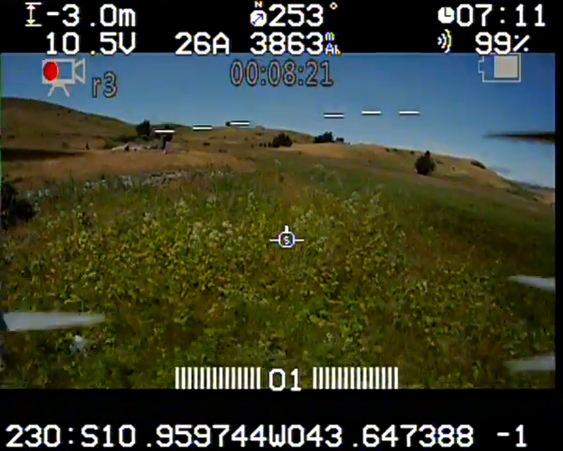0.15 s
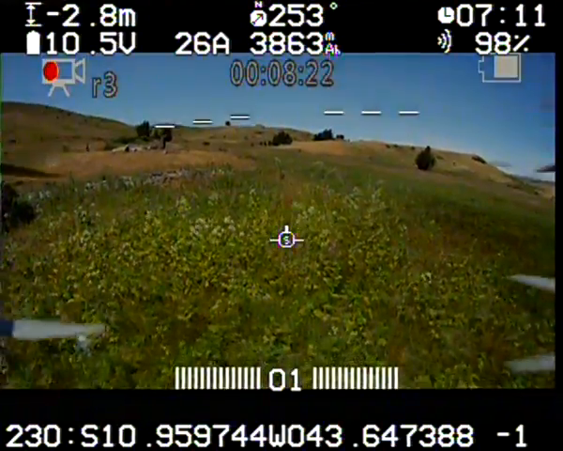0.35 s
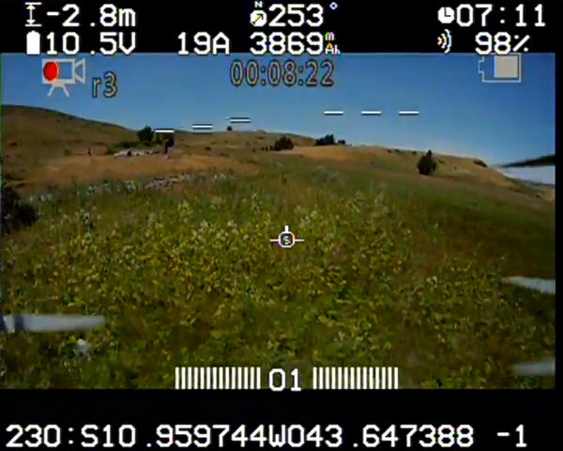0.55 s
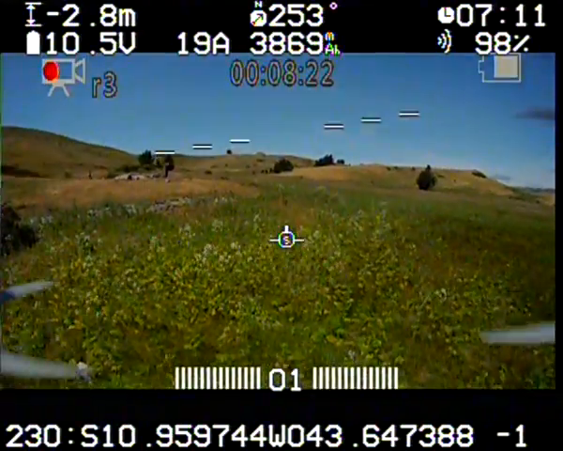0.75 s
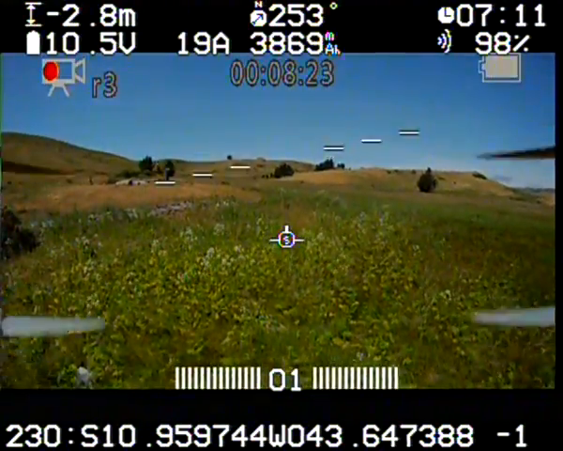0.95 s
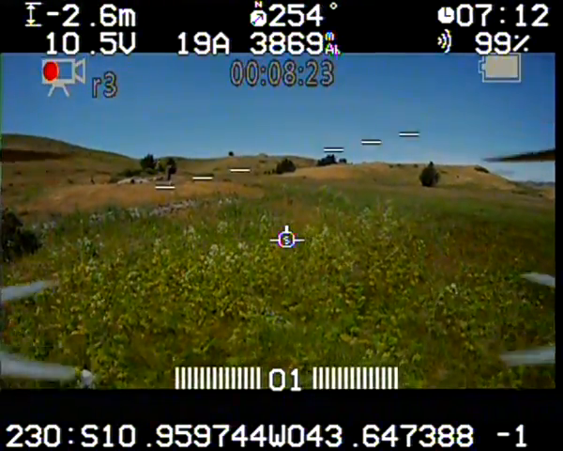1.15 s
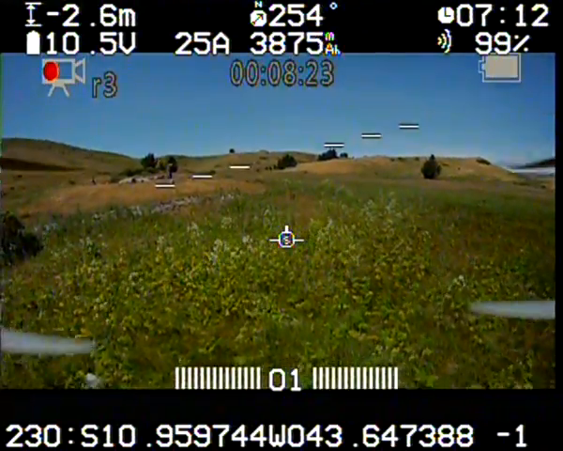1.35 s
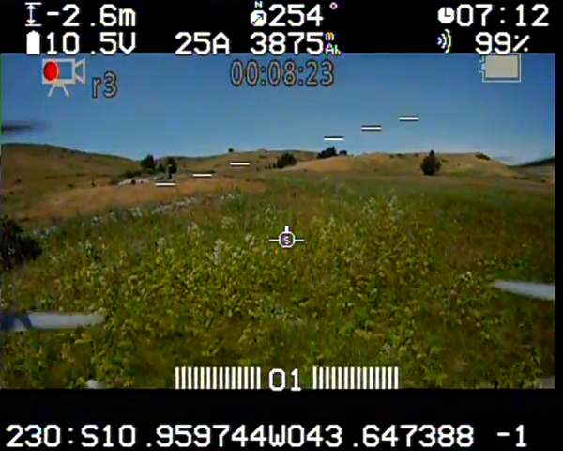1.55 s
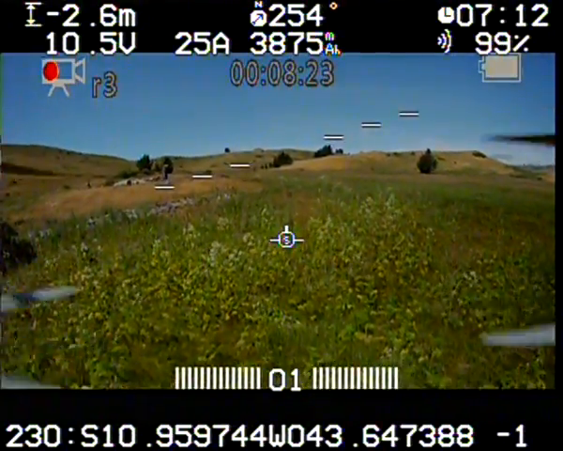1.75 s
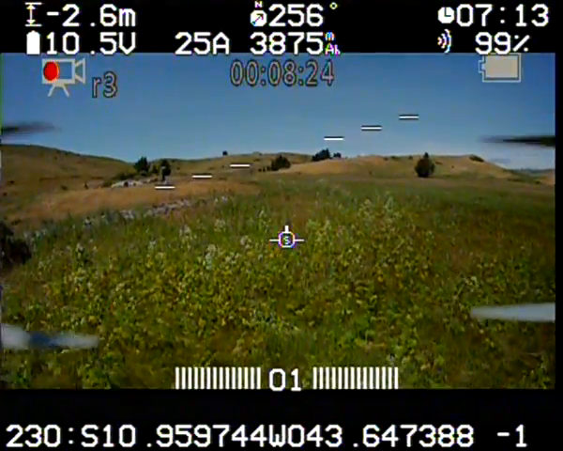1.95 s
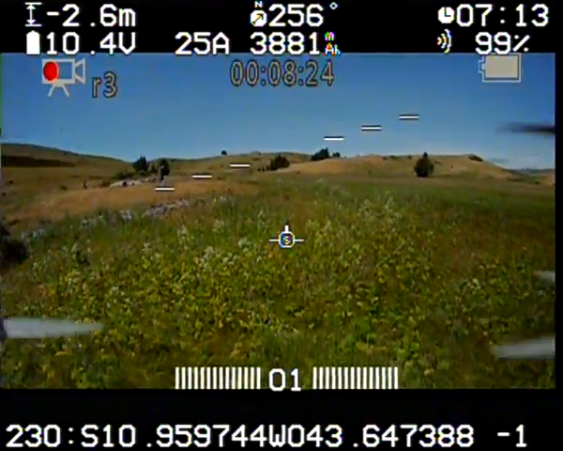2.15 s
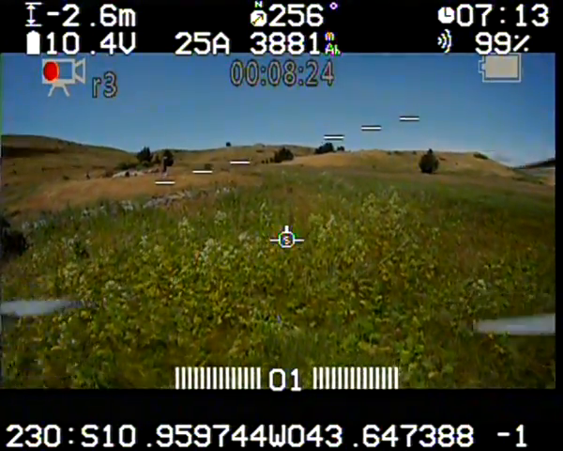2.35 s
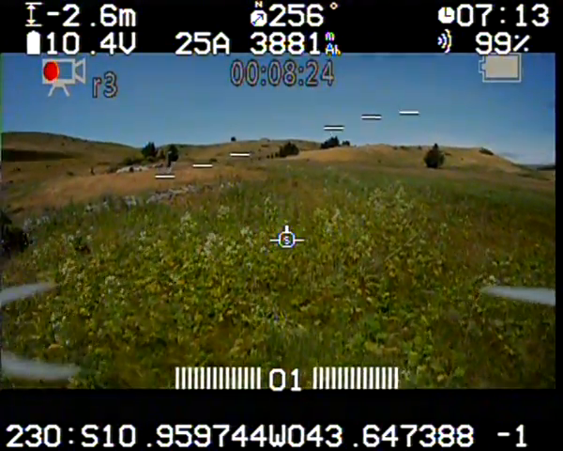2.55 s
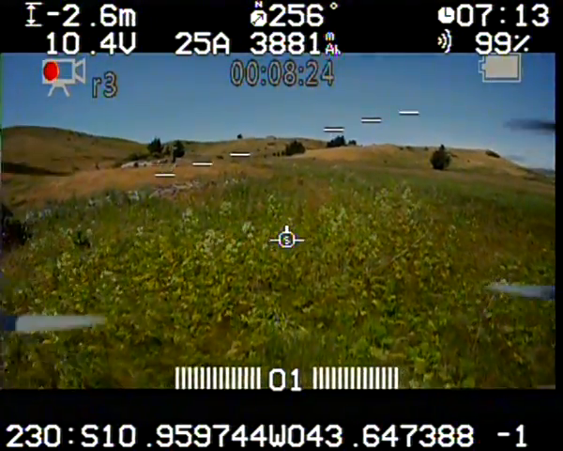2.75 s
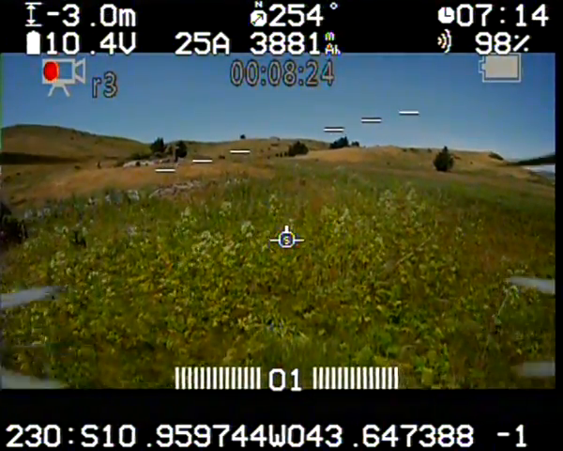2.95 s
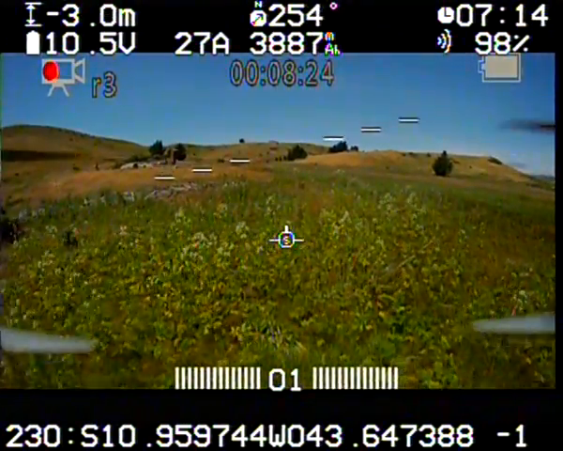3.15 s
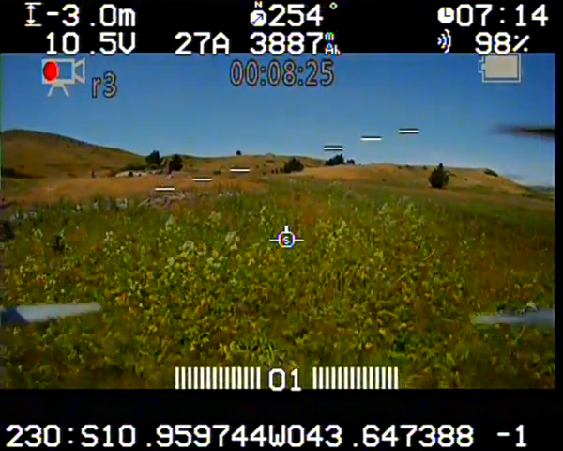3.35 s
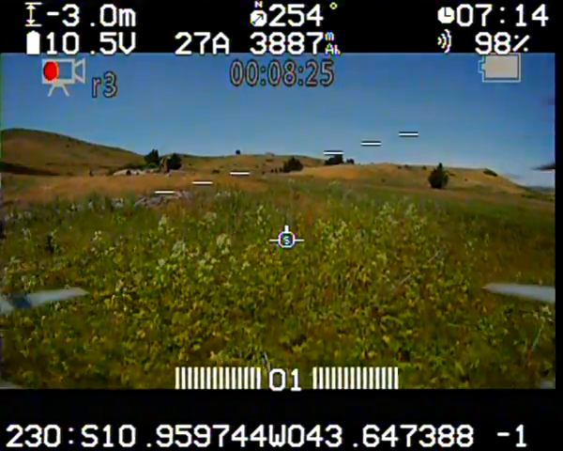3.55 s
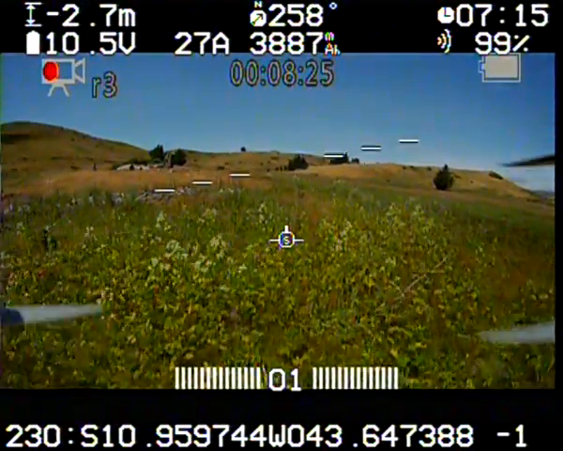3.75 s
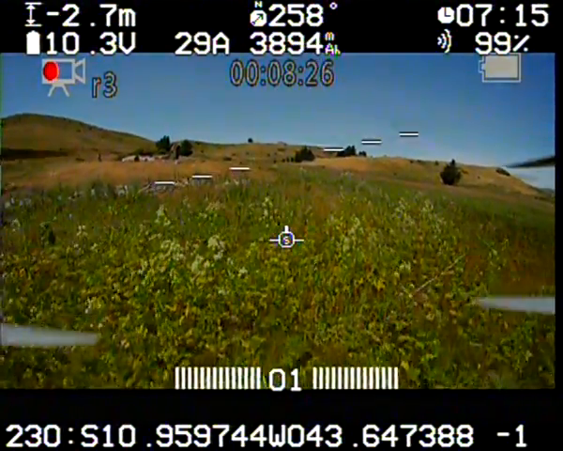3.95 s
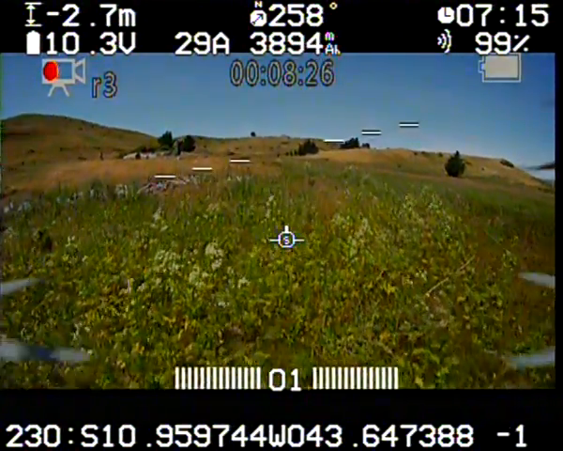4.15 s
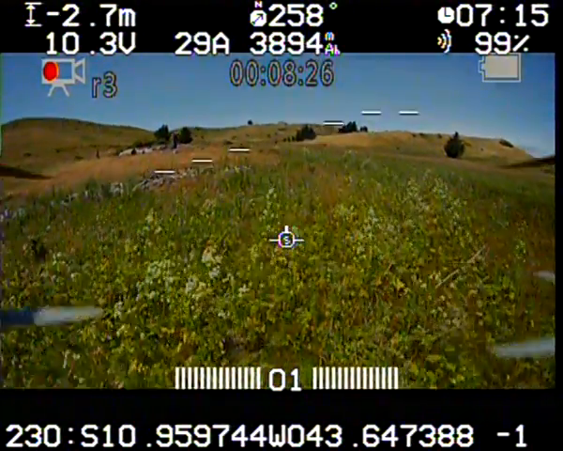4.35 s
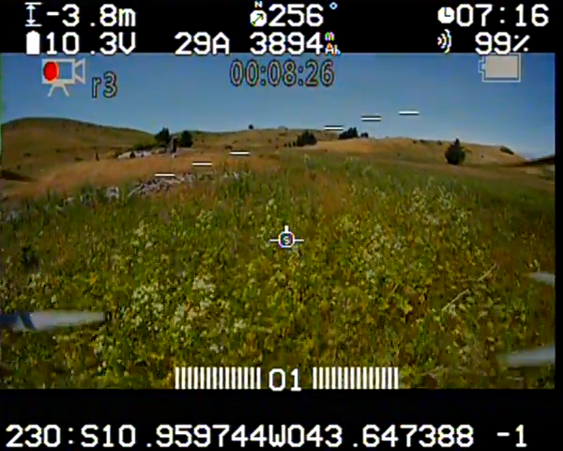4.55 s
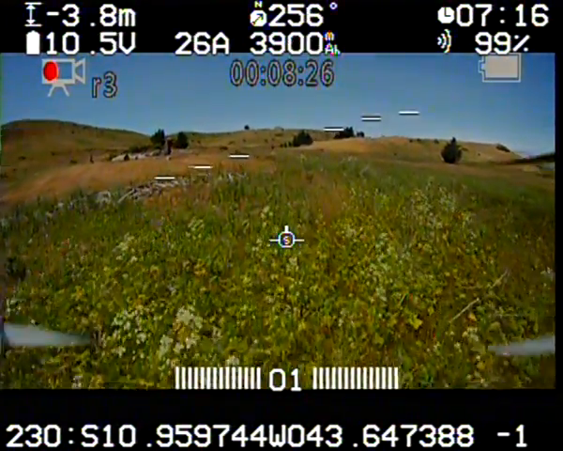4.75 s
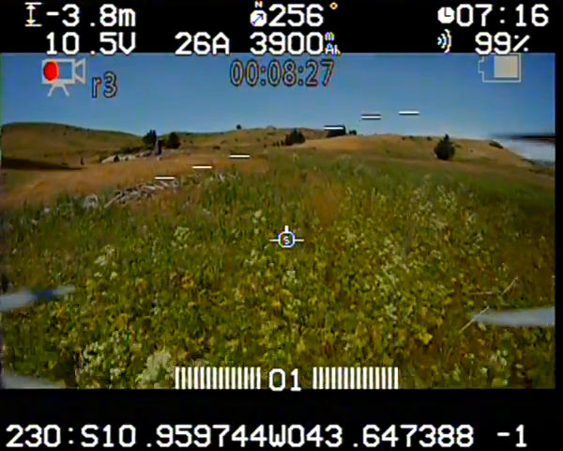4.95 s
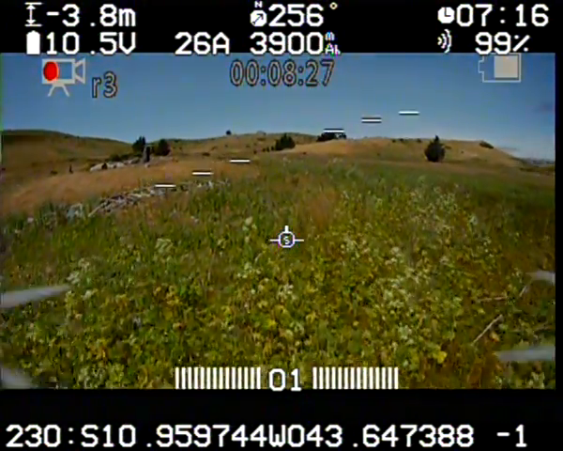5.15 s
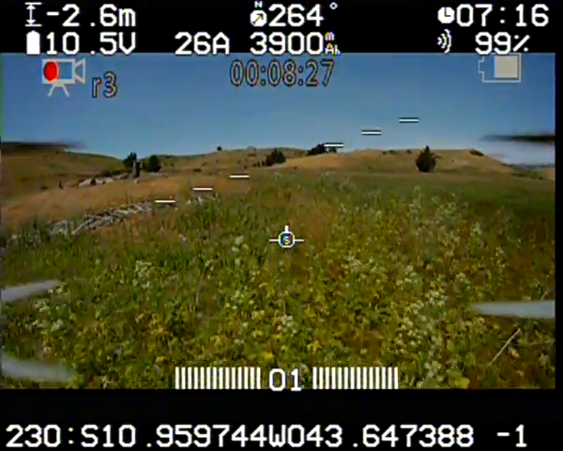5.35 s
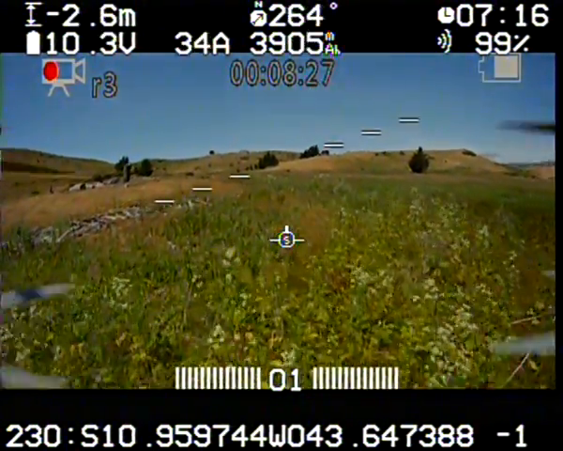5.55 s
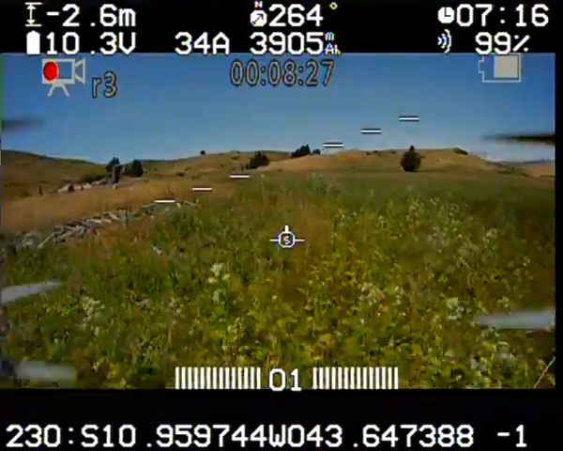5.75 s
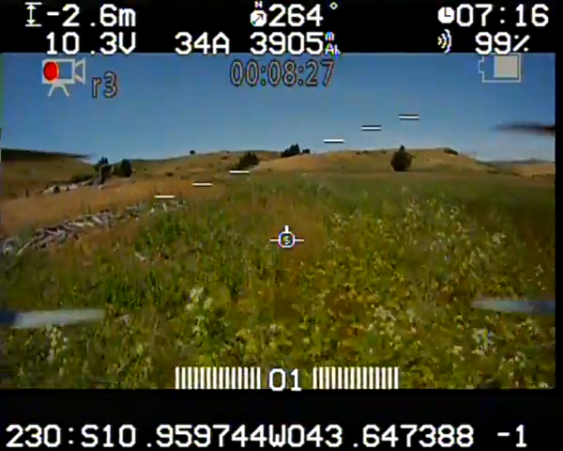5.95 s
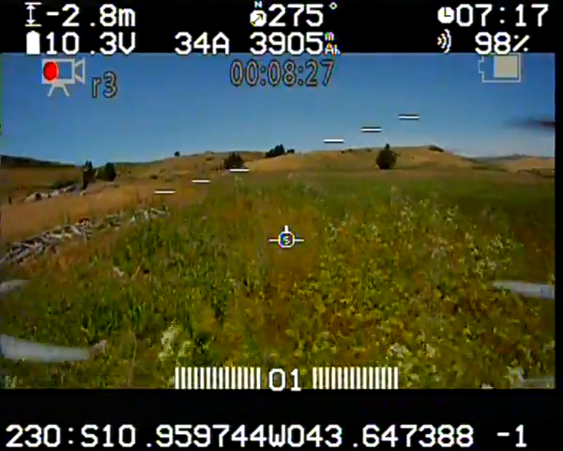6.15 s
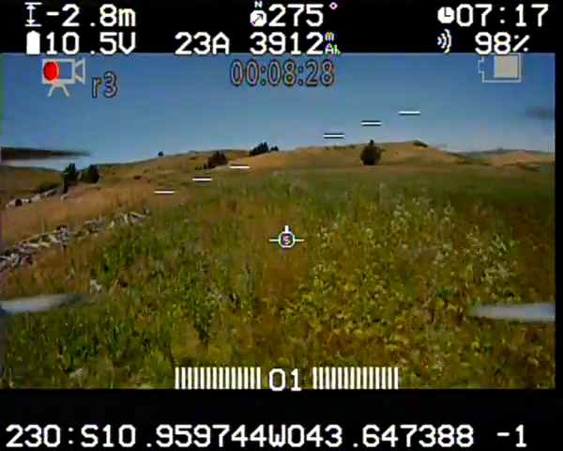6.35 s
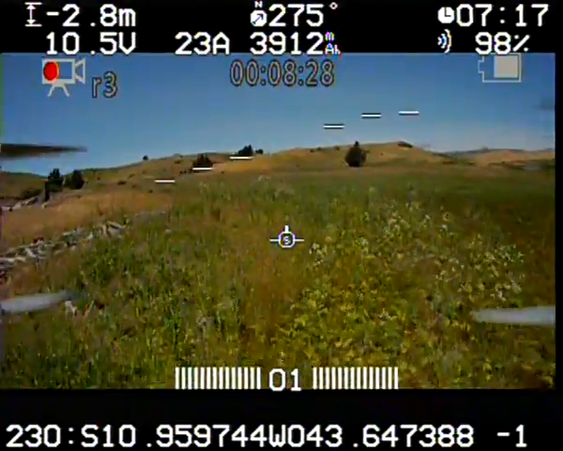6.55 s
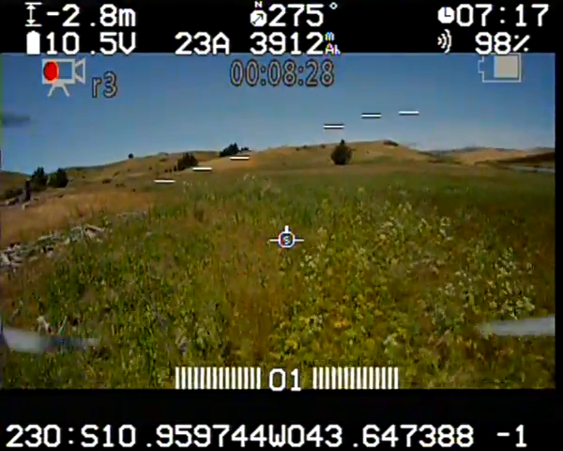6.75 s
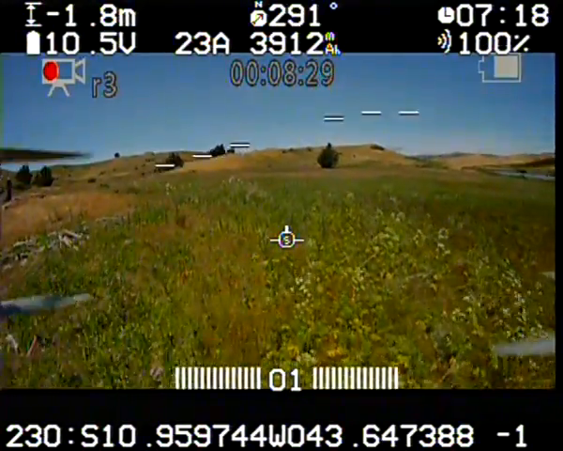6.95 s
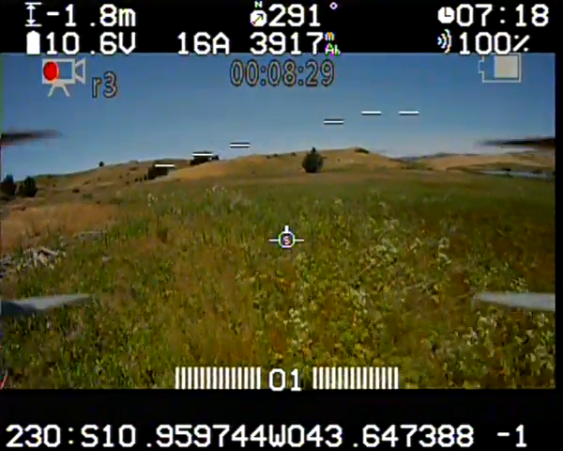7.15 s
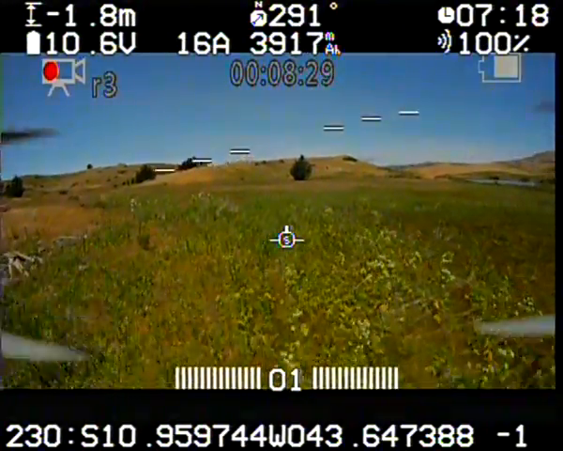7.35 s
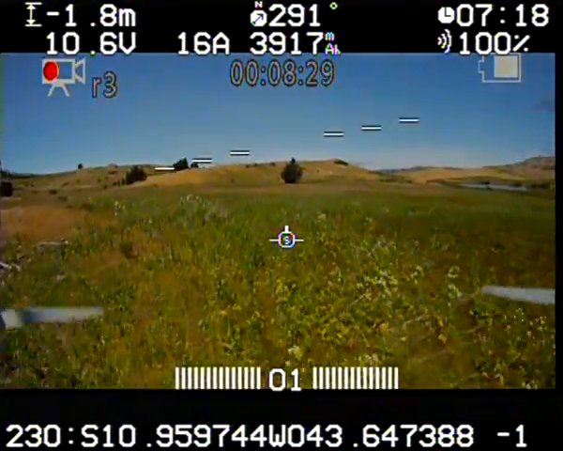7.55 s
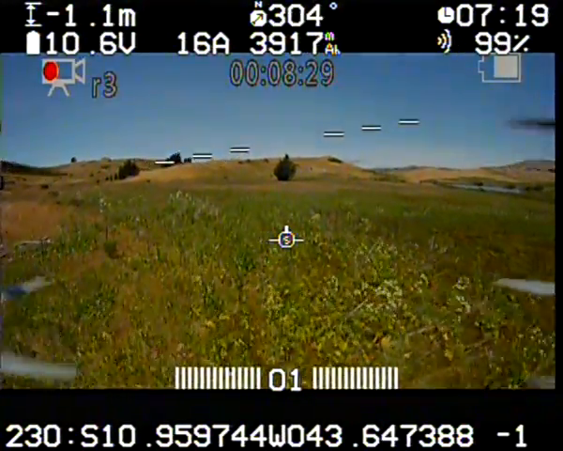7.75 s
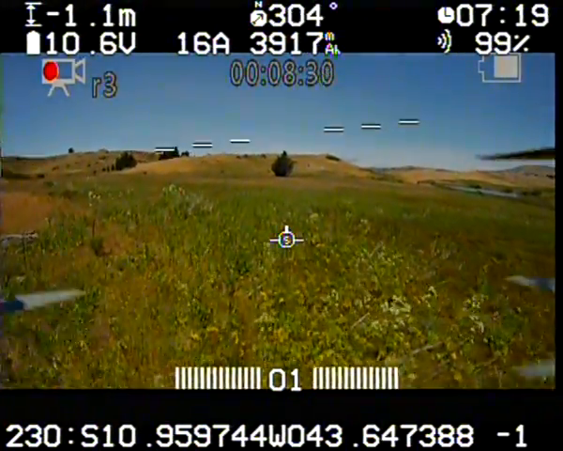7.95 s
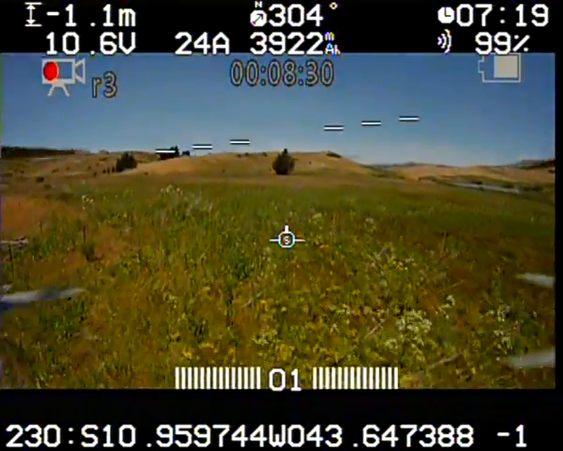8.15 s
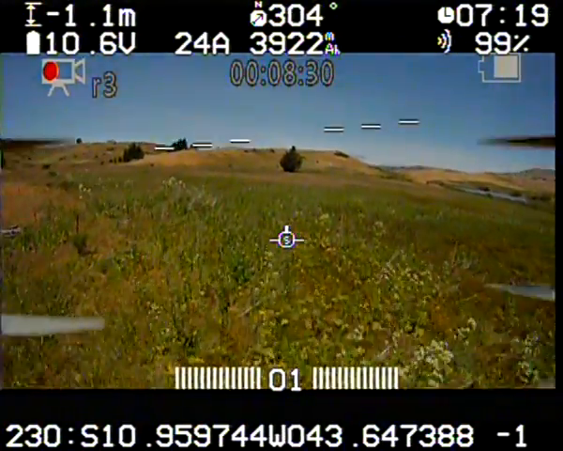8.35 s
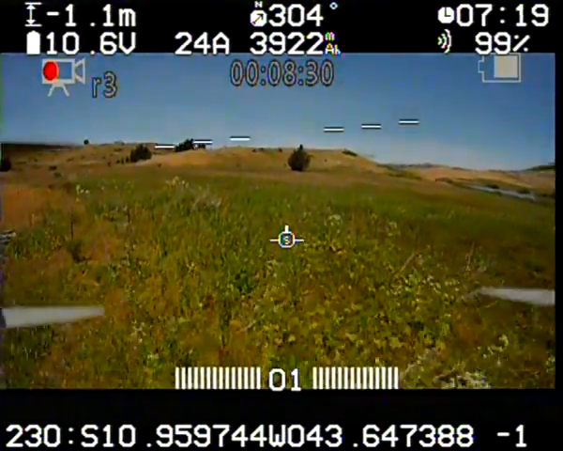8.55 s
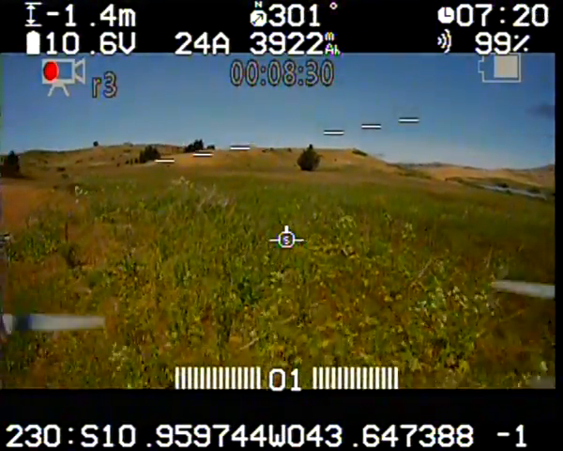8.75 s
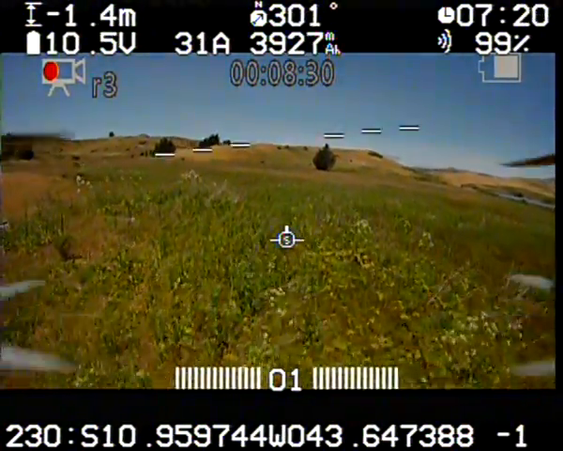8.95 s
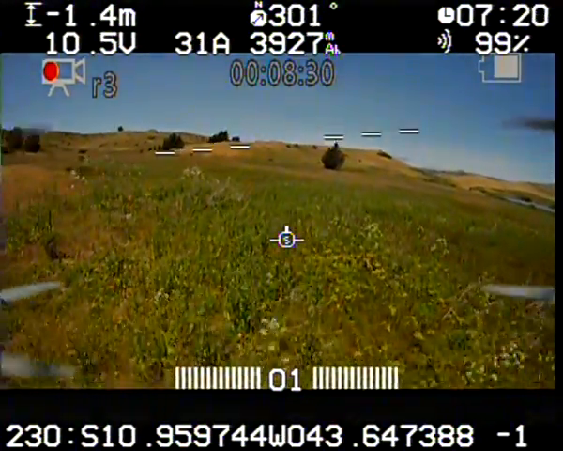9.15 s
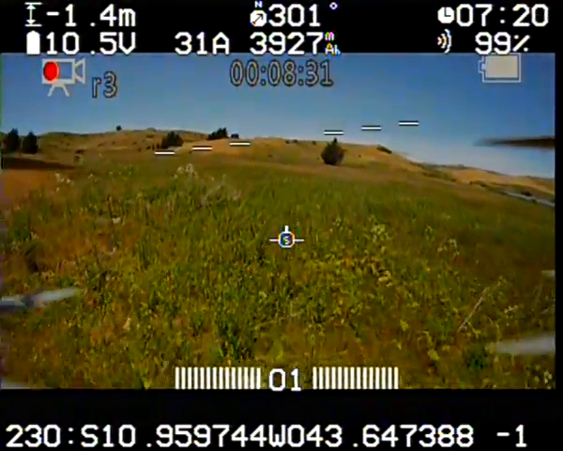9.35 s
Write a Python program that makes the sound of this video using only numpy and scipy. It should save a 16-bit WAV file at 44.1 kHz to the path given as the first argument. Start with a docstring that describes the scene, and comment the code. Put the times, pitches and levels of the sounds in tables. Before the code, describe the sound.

Through a small hissy microphone, a car rushes by with roaring tyres, followed by two heavy vehicles droning past, their low hums and whines bending downward.

```python
"""Traffic across open grassland

Motor traffic passes in open grassland, heard through a small, hissy microphone.
A car goes by with a roar of tyres, then two heavier vehicles, each with an engine hum that sinks in pitch.
Road sound is shaped noise that swells with each pass; hums and whines are sines geared to the firing rate.
Two short low drones come and go, as of tyres running over a ribbed road marking.
Small ticks, airy swishes, faint squeaks and blips dot the scene."""
import sys
import numpy as np
from scipy import signal
from scipy.fft import rfft, irfft
from scipy.io import wavfile

SR = 44100
rng = np.random.default_rng(int(sys.argv[2]) if len(sys.argv) > 2 else 0)


def to_wav(s):
    """Save 16-bit WAV."""
    ch = np.atleast_2d(s).T  # columns
    pcm = np.round(np.clip(ch, -1, 1) * 32767)  # PCM
    wavfile.write(sys.argv[1], SR, pcm.astype(np.int16))


N = 414540
TIME = np.arange(N) / SR  # seconds
BINS = np.maximum(np.arange(N // 2 + 1) * SR / N, 1)  # Hz, floored at 1 so that its log exists

# vehicles going by: closest_s, approach_s, retreat_s, boom_db, roar_db, tyre_hiss_db, rush_db
PASSES = [(0, 1.0, 1.2, -45, -62, -53, -55.5), (1.35, 1.23, 3.1, -36.5, -37, -36, -55),
          (2.44, 1.5, 0.96, -25, -33.5, -29, -45.5), (4.78, 0.81, 0.86, -25, -29, -32, -40.5),
          (6.24, 1.28, 0.82, -27, -29.5, -33, -43.5), (8.85, 2.1, 4.8, -50, -52, -47, -58)]
# how steeply boom, roar, tyre hiss and rush fall off: power_of_distance for each
ROAD_FALLOFF = [2.82, 4, 4.3, 5.0]
# level of the deep rumble: time_s, level_db
RUMBLE_LEVEL = [(0, -33.5), (.9, -32), (1.9, -23.5), (2.6, -20), (3.6, -29), (6.3, -27.5), (7.2, -31),
                (7.8, -28), (9.4, -35)]
# roar surging as wheels draw level with the microphone: centre_s, half_length_s, boost_db
SURGES = [(2.497, 0.069, 2), (3.056, 0.074, 3), (3.955, 0.12, 5), (4.73, 0.039, 3.5), (4.98, 0.064, 3.8),
          (6.249, 0.067, 4), (6.602, 0.15, 1.5), (9.36, 0.045, 4.5)]

# noise colours, from deep to bright: frequency_hz, relative level_db_per_hz
RUMBLE_COLOUR = [(8, -18.5), (20, 4), (35, -6), (70, -0.5), (120, -3.5), (170, -7), (240, -15), (400, -37)]
BOOM_COLOUR = [(50, -16), (110, 2), (170, 2.5), (280, 0), (400, -3.5), (500, -3.5), (620, -22.5),
               (900, -45)]
ROAR_COLOUR = [(330, -22), (480, 4.5), (590, 7), (740, 5.5), (850, 1), (1100, -26)]
TYRE_COLOUR = [(600, -15), (760, -8.5), (850, -1), (1000, -2.5), (1120, -7), (1260, -16.5), (1500, -38),
               (2200, -45)]
RUSH_COLOUR = [(900, -15), (1280, 6.5), (1500, 0), (1880, -5.5), (2200, -16), (3400, -20.5), (6000, -22.5),
               (10000, -22)]

# strength of the car's tread note: time_s, level_db
TREAD_LEVEL = [(0, -42.5), (1.2, -32.5), (1.5, -29), (2.15, -31.5), (2.55, -25), (3.05, -22), (3.25, -35.5),
               (4, -70)]
# tread note at rest (Hz), moment and half-length of its bend (s), share by which motion shifts it
TREAD_HZ, CAR_LEVEL_S, CAR_HALF_S, DOPPLER_SHARE = 229.8, 2.58, 0.27, 0.14

# low drones: start_s, end_s, pitch_hz, tone_db, shudder_db
DRONES = [(0.39, 1.032, 87.5, -27.5, -38.5), (7.462, 8.352, 104, -22, -26)]
# colour of the shudder under the drones: frequency_hz, relative level_db_per_hz
SHUDDER_COLOUR = [(30, -14), (50, 1), (82, 19), (110, 6), (140, 5), (250, -19)]

# small ticks and knocks: time_s, peak_db, centre_hz, width_hz
TICKS = [(1.006, -22, 900, 300), (1.109, -24, 840, 300), (1.298, -29, 1660, 657), (1.298, -30, 4330, 1200),
         (1.345, -18.5, 900, 500), (2.509, -26, 9830, 4500)]

# airy swish of each vehicle drawing level: centre_s, half_length_s, level_db
SWISHES = [(2.4, 0.36, -60), (4.852, 0.18, -65), (6.245, 0.26, -51)]
# colour of the swish: frequency_hz, relative level_db_per_hz
SWISH_COLOUR = [(1500, -20), (2600, -3), (3500, 2.5), (5000, 0), (6200, -1), (10000, -8.5), (13000, -14)]

# firing rate of each engine, lowered as it passes: time_s, pitch_hz
FIRST_PITCH = [(0, 71.5), (3, 72.1), (4.2, 71), (4.6, 69.1), (5, 65.7), (5.4, 62.7), (6, 60.4), (7.8, 59.1),
               (9.4, 57.2)]
SECOND_PITCH = [(3.8, 124), (5.75, 121.5), (6.2, 117.6), (6.6, 111.7), (7, 108.7), (7.4, 107.5),
                (7.8, 104.2), (9.4, 98.3)]
# exhaust hum of each engine: harmonic, loudest_s, approach_s, retreat_s, level_db, power_of_distance
FIRST_HUM = [(1, 4.91, 0.35, 0.47, -16, 0.88), (2, 5.3, 0.82, 0.76, -26, 0.78),
             (3, 4.66, 0.2, .3, -24.5, 1.03), (4, 5.86, 0.35, 0.42, -39, 2.2)]
SECOND_HUM = [(1, 6.08, .58, 0.53, -21.5, 1.1), (2, 6.38, 0.89, 0.71, -27.5, 2.36),
              (3, 6.66, 1.7, 0.4, -42, 2.1)]
# whine of gears and tyre tread, each beamed its own way:
# multiple of firing rate, loudest_s, approach_s, retreat_s, level_db, phase_wander_hz
FIRST_WHINE = [(4.5, 4.3, 0.85, .6, -42, 3.5), (5.18, 5.05, .65, 0.54, -30.5, 1.6),
               (5.5, 4.56, 0.33, 0.3, -36.5, 2.2), (10.5, 4.18, .35, 0.29, -41.5, 1.9)]
SECOND_WHINE = [(3.95, 6.3, .2, 0.43, -35.5, 1.8), (4.89, 6.35, 0.85, 0.51, -31.5, 3.1),
                (6.1, 6.3, 0.35, 0.33, -39.5, 2.3), (6.1, 7.95, 0.31, 0.37, -54, 2.7),
                (9.18, 5.55, 0.5, 0.61, -43, 1.5), (12.2, 6.63, 0.66, .35, -52, 5)]

# faint squeaks and blips: centre_s, length_s, start_hz, end_hz, blur_hz, level_db (before an overall lift)
CHIRPS = [(6.08, .09, 3550, 3550, 80, -54), (6.27, .17, 2900, 4150, 150, -46),
          (6.27, .14, 5800, 6200, 300, -55), (8.565, .04, 790, 790, 30, -40),
          (8.622, .03, 800, 800, 35, -37), (8.737, .035, 770, 860, 40, -35)]

# colour of the microphone's hiss: frequency_hz, relative level_db_per_hz
HISS_COLOUR = [(1000, -32), (1700, -1), (2250, -2), (2430, -3.5), (7710, -7.5), (10000, -8.5), (13000, -13),
               (22000, -120)]
# overall treble balance, with a dip near 11 kHz: frequency_hz, gain_db
TREBLE = [(9000, 0), (10000, -2), (10500, -4.5), (11000, -11), (12000, -8), (12600, -17), (13300, -23)]
HISS_DB, CUTOFF_HZ = -46.5, 13650


def from_db(db):
    """Decibels to gain."""
    return 10 ** (np.asarray(db) / 20)


def rms_one(x):
    """Scale to rms 1."""
    return x / np.sqrt(np.mean(x ** 2) + 1e-20)


def curve(rows):
    """Draw straight lines through (time, value) points, sample by sample."""
    times, values = np.transpose(rows)
    return np.interp(TIME, times, values)


def response(points):
    """Gain at every frequency bin from (Hz, dB) points, joined along a log frequency scale."""
    hz, db = np.transpose(points)
    return from_db(np.interp(np.log(BINS), np.log(hz), db))


def noise(points):
    """Noise of a given colour that falls away beyond its last point; rms 1."""
    skirt = 1 / (1 + (BINS / (2 * points[-1][0])) ** 4)
    spectrum = rfft(rng.standard_normal(N))
    return rms_one(irfft(spectrum * response(points) * skirt, N))


def drift(rate):
    """Slow random wander with about `rate` turns a second; spread 1."""
    step = 40  # drawn once every 40 samples, then joined up
    warm_up = 2000
    r = np.exp(-2 * np.pi * rate * step / SR)
    draws = rng.standard_normal(N // step + 2 + warm_up)
    slow = signal.lfilter([1], [1, -2 * r, r * r], draws)[warm_up:]
    return np.interp(np.arange(N) / step, np.arange(len(slow)), rms_one(slow))


def phase_of(hz):
    """Running phase of a moving frequency."""
    return 2 * np.pi * np.cumsum(hz) / SR


def blurred_line(phase, width):
    """A tone whose strength and phase wander at random."""
    return (drift(width) * np.cos(phase) + drift(width) * np.sin(phase)) / np.sqrt(2)


def swell(s, approach_s, retreat_s, falloff):
    """Gain of a source moving past on a straight line: 1 when closest, falling as a power of the distance."""
    along = (TIME - s) / np.where(TIME < s, approach_s, retreat_s)
    return (1 + along ** 2) ** (-falloff / 2)


def microphone_hiss():
    """Steady coloured noise of the microphone itself."""
    inner_points = HISS_COLOUR[1:-1]  # the outermost points are left out
    return from_db(HISS_DB) * noise(inner_points)


def passing_level(layer):
    """One road layer's gain: the powers of all passing vehicles add up."""
    power = 0
    for s, approach_s, retreat_s, *levels in PASSES:
        gain = from_db(levels[layer]) * swell(s, approach_s, retreat_s, ROAD_FALLOFF[layer])
        power = power + gain ** 2
    return np.sqrt(power)


def road(flutter_db, throb):
    """Rumble carries far; roar and tyre hiss swell with each vehicle, and its bright rush is heard close by."""
    boom, roar, tyres, rush = [passing_level(layer) for layer in range(4)]
    rumble = from_db(curve(RUMBLE_LEVEL)) * noise(RUMBLE_COLOUR)
    surge = from_db(sum(db * swell(s, half_s, half_s, falloff=2.6) for s, half_s, db in SURGES))
    body = boom * noise(BOOM_COLOUR) + surge * roar * noise(ROAR_COLOUR)
    bright = surge * (tyres * noise(TYRE_COLOUR) + rush * noise(RUSH_COLOUR))
    fluttering = bright * from_db(flutter_db * drift(16))
    # while the first heavy engine is near, its exhaust chops the road noise at the firing rate
    _, s, approach_s, retreat_s, _, falloff = FIRST_HUM[0]
    nearness = swell(s, approach_s, retreat_s, falloff)
    puffs = 1 + throb * nearness * np.sin(phase_of(curve(FIRST_PITCH)))
    return rumble + puffs * (body + fluttering)


def car_tread():
    """Uneven tread blocks give a broad note that drops as the car goes by."""
    offset_s = TIME - CAR_LEVEL_S
    receding = offset_s / np.hypot(offset_s, CAR_HALF_S)  # -1 approaching, +1 leaving
    centre_hz = TREAD_HZ / (1 + DOPPLER_SHARE * receding)
    note = np.sqrt(2) * blurred_line(phase_of(centre_hz), width=23.5)
    return from_db(curve(TREAD_LEVEL)) * note


def drones(edge_s):
    """Ribs drum on the tyres: a low note over a shudder, starting and stopping abruptly."""
    out = np.zeros(N)
    for start, end, hz, tone_db, shudder_db in DRONES:
        gate = np.clip(np.minimum(TIME - start, end - TIME) / edge_s + 0.5, 0, 1)
        unsteady_hz = hz * (1 + 0.0073 * drift(2.3))
        tone = np.sqrt(2) * np.sin(phase_of(unsteady_hz))
        shudder = noise(SHUDDER_COLOUR)
        out += gate * (from_db(tone_db) * tone + from_db(shudder_db) * shudder)
    return out


def ticks():
    """Tiny clicks: an impulse rings a band of frequencies and dies within milliseconds."""
    out = np.zeros(N)
    for s, db, hz, width in TICKS:
        edges = np.clip([hz - width / 2, hz + width / 2], 50, 0.45 * SR)
        band = signal.butter(4, edges, "band", fs=SR, output="sos")
        click = signal.sosfilt(band, signal.unit_impulse(SR // 50))
        at = round(s * SR)
        out[at:at + len(click)] += from_db(db) * click / np.abs(click).max()
    return out


def swishes():
    """Air torn by wheels and bodywork falls off with distance on either side of the pass."""
    power = sum((from_db(db) * swell(s, half_s, half_s, falloff=1.0)) ** 2 for s, half_s, db in SWISHES)
    return np.sqrt(power) * noise(SWISH_COLOUR)


def engine(pitch, harmonics, whine, flutter_db, whine_flutter_db, whine_falloff):
    """Clean firing harmonics with higher, rougher whines geared to the same speed."""
    phase = phase_of(curve(pitch))
    hum, whines = 0, 0
    for harmonic, s, approach_s, retreat_s, db, falloff in harmonics:
        # turbulent air on the way makes each harmonic flutter, where flutter_db is above 0
        level = from_db(db + flutter_db * drift(4.2))
        strength = level * swell(s, approach_s, retreat_s, falloff)
        hum = hum + strength * np.sin(harmonic * phase + rng.uniform(0, 2 * np.pi))
    for multiple, s, approach_s, retreat_s, db, wander_hz in whine:
        level = from_db(db + whine_flutter_db * drift(15))
        strength = level * swell(s, approach_s, retreat_s, whine_falloff)
        whines = whines + strength * np.sin(multiple * phase + drift(wander_hz))
    return np.sqrt(2) * (hum + whines)


def chirps(lift_db):
    """Short, smeared tones, each swelling for a moment on a steady or sliding pitch."""
    out = np.zeros(N)
    for s, length, start_hz, end_hz, blur_hz, db in CHIRPS:
        progress = np.clip((TIME - s) / length + 0.5, 0, 1)
        glide = phase_of(start_hz + (end_hz - start_hz) * progress)
        out += from_db(db + lift_db) * np.sin(np.pi * progress) * blurred_line(glide, blur_hz)
    return out


def scene():
    """The vehicles in turn, over the noise of the road."""
    rolling = road(flutter_db=1.08, throb=0.14) + car_tread() + drones(edge_s=0.023)
    first = engine(FIRST_PITCH, FIRST_HUM, FIRST_WHINE,
                   flutter_db=1.0, whine_flutter_db=3.0, whine_falloff=1.48)
    second = engine(SECOND_PITCH, SECOND_HUM, SECOND_WHINE,
                    flutter_db=0.0, whine_flutter_db=2.5, whine_falloff=2.03)
    small_sounds = ticks() + swishes() + chirps(lift_db=0.5)
    return (rolling + first + second + small_sounds)[None]


def record(dry):
    """Add a steady hiss, then dull the top treble and cut it off steeply."""
    heard = dry + microphone_hiss()
    coloured = irfft(rfft(heard) * response(TREBLE), N)
    low_pass = signal.ellip(10, 0.1, 80, CUTOFF_HZ, fs=SR, output="sos")  # ripple and stop band in dB
    return signal.sosfilt(low_pass, coloured)


dry = scene()
out = record(dry)
to_wav(out)
```